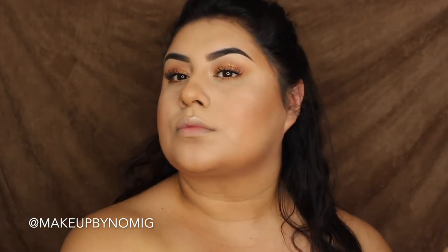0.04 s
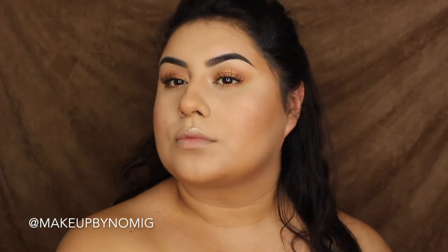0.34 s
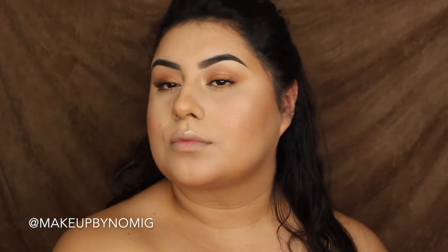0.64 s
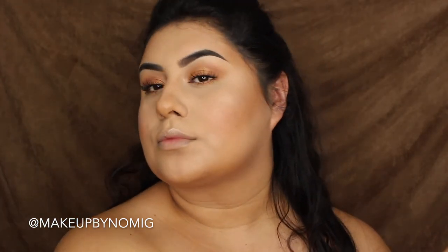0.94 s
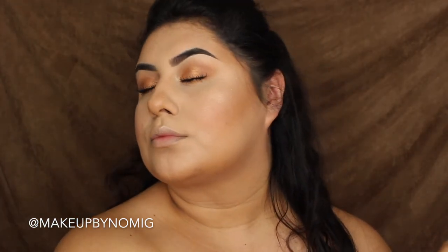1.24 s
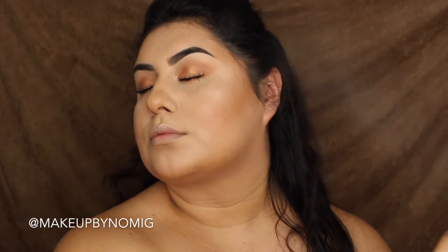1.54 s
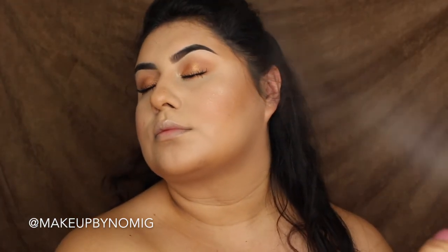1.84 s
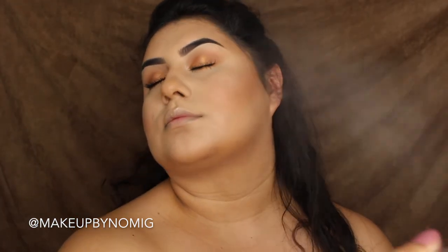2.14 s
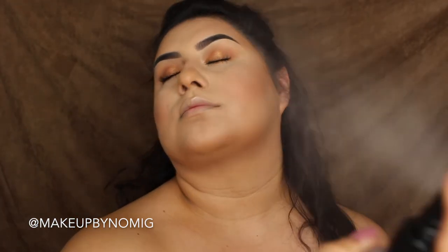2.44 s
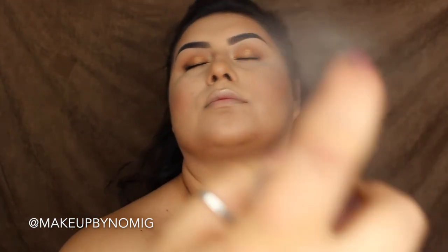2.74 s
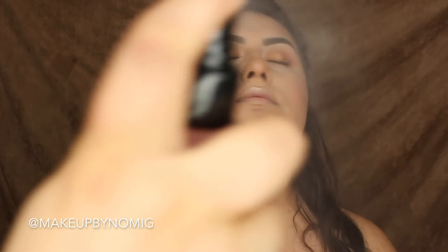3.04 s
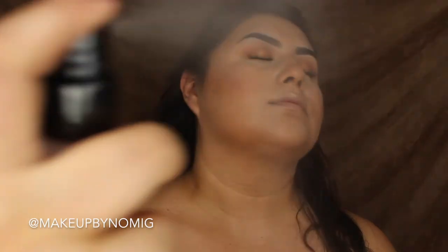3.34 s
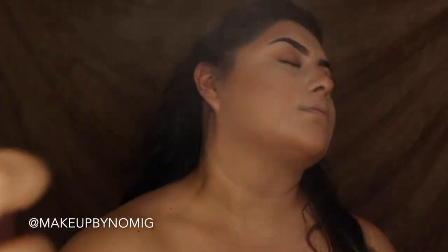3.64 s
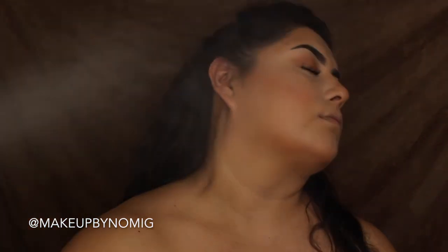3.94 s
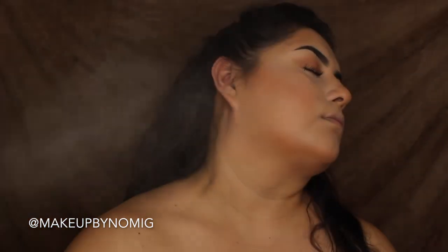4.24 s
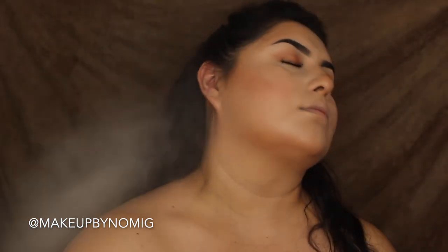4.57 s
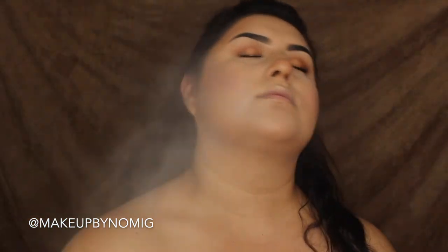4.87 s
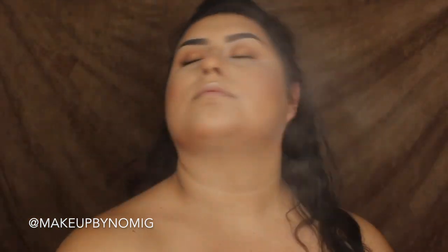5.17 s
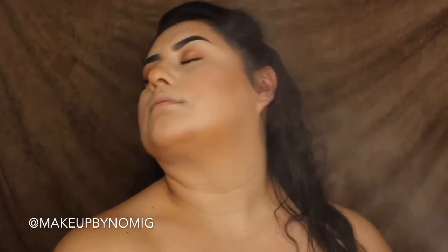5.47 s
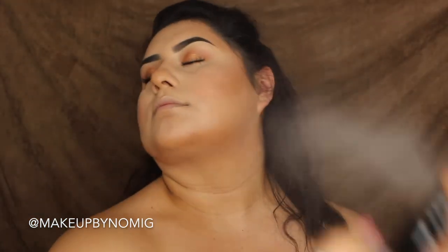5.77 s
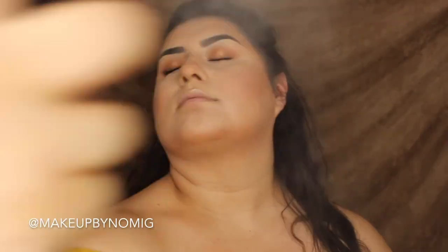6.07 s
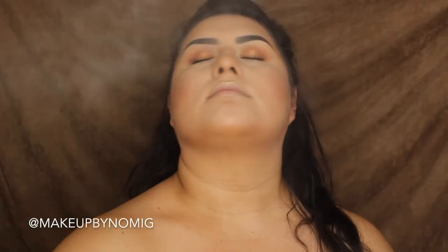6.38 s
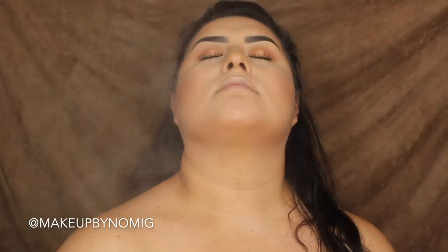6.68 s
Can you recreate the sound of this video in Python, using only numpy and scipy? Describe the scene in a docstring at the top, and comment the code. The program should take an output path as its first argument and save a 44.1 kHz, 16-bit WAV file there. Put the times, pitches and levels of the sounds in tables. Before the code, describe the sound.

A hand softly shifts its grip on a plastic spray bottle, then starts spritzing close to the microphone, four or five times a second. Every brief hiss of mist begins with a small click and is followed by a dull pop from the returning pump. The run continues without a pause, drifting slightly from side to side. The small room has little echo, only faint air noise, hum and a ticking lens motor.

```python
"""A small mist bottle is pumped 24 times in a quick run, close by in a small draped room.
In each cycle the plastic head clicks under the finger, the nozzle hisses as liquid breaks into drops,
the piston bottoms out, and the valve knocks as it springs back. Steady resonances of the room
colour these sounds, as well as the few rubs and the faint squeak of the grip that precede them.
Behind it lie the faint ticking of a lens focus motor, room air and mains hum."""
import sys
import numpy as np
from scipy import signal
from scipy.fft import rfft, irfft, next_fast_len
from scipy.io import wavfile
from scipy.ndimage import uniform_filter1d

SR = 44100
rng = np.random.default_rng(int(sys.argv[2]) if len(sys.argv) > 2 else 0)


def file_out(sig):
    """Save sig as 16-bit WAV at sys.argv[1]."""
    # one column per channel
    cols = np.atleast_2d(sig).T
    # limit, then scale
    lim = np.clip(cols, -1, 1)
    pcm = np.round(lim * 32767).astype(np.int16)
    wavfile.write(sys.argv[1], SR, pcm)


N = 304731

# pump cycles: (click time [s], nozzle opening time [s], knock time [s],
# click level [dB], jet level [dB], knock level [dB])
CYCLES = [(1.432, 1.465, 1.599, -46.5, -32, -28), (1.663, 1.686, 1.819, -44.5, -30.5, -29.5),
          (1.866, 1.888, 2.015, -43.5, -31.5, -26.5), (2.067, 2.091, 2.223, -43, -30.5, -26),
          (2.269, 2.291, 2.425, -41.5, -30.5, -25), (2.472, 2.496, 2.637, -43, -30, -26),
          (2.674, 2.695, 2.839, -41, -29, -23.5), (2.883, 2.905, 3.047, -41, -28.5, -23.5),
          (3.088, 3.109, 3.26, -40.5, -27.5, -25.5), (3.301, 3.323, 3.472, -40.5, -27.5, -24),
          (3.515, 3.537, 3.683, -39.5, -28, -25), (3.727, 3.749, 3.906, -41, -29, -25),
          (3.945, 3.968, 4.127, -43.5, -30, -27), (4.17, 4.189, 4.343, -44.5, -31.5, -27.5),
          (4.382, 4.403, 4.565, -44.5, -31.5, -32), (4.595, 4.614, 4.777, -41, -31, -24.5),
          (4.815, 4.835, 4.995, -43.5, -30, -23), (5.043, 5.061, 5.234, -42, -29, -25),
          (5.273, 5.295, 5.459, -42.5, -30, -27.5), (5.505, 5.52, 5.697, -42.5, -31.5, -27),
          (5.741, 5.762, 5.937, -44, -30.5, -26), (5.972, 5.994, 6.167, -39.5, -28, -22),
          (6.219, 6.239, 6.424, -37, -28, -39), (6.45, 6.47, 6.655, -38.5, -32, -28.5)]
ORDINARY_DB, ORDINARY_S = -30.0, 0.115  # reference level and length of a stroke


def jet(length, db, width_db, pan_db, size=10240):
    """Atomisation: one stroke hisses, finest at peak pressure, and the coarse drops come last."""
    # jet spectrum: (frequency [Hz], level [dB])
    spectrum = [(150, -32), (330, -28), (560, -20), (720, -19), (900, -18.5), (1250, -12.5), (1600, -6.5),
                (2500, -4), (3600, 0.5), (5400, -4.5), (7500, -11), (9300, -15), (11200, -17),
                (12200, -24.5), (16000, -29.7)]
    # stereo difference relative to the sum: (frequency [Hz], level [dB])
    side_spectrum = [(300, -12), (1300, -23), (2200, -10), (3500, -11.5), (5400, -7), (6200, -9), (7000, 2),
                     (7900, 1), (9000, 2), (10800, -5.5), (12300, -1), (14000, 2), (16000, -12)]
    t, hz = np.arange(size) / SR, bins(size)
    stronger, slower = db - ORDINARY_DB, length - ORDINARY_S
    pressure = np.sin(np.pi * np.clip(t / length, 0, 1))
    rise_s = 0.028 * length * np.exp(-0.12 * stronger)  # a hard push opens the nozzle more abruptly
    opening = 1 - np.exp(-(t / rise_s) ** 2)
    mist_flow = .5 - .5 * np.tanh((t - 0.83 * length) / 0.024)
    dribble = .5 - .5 * np.tanh((t - 0.83 * length - 0.025) / 0.042)
    # a strong jet has more body and a rounder top; a slow one is thinner and airier
    body_db = -0.5 + 0.45 * stronger - 28 * slower
    top_db = 0.4 - 0.6 * stronger + 50 * slower
    shape_db = read(spectrum, hz) + body_db * bump(hz, 1560, 0.3) + top_db * bump(hz, 10900, 0.22)
    sizzle, fizz = 0.85 * bump(hz, 7600, 0.27), 0.7 * bump(hz, 14500, 0.2)
    shape_db = unit_power(shape_db) + stronger * (sizzle + fizz)
    # off axis the two microphones fall out of phase in the treble: sum dips, difference grows
    mid_db = shape_db - 0.91 * width_db * bump(hz, 6400, 0.1)
    side_db = shape_db + read(side_spectrum, hz) + width_db * (1 + 0.5 * bump(hz, 7800, 0.3))
    treble, bass = 1 / (1 + (6000 / (hz + 1)) ** 4), 1 / (1 + (hz / 1900) ** 4)
    mid_side = []
    for part_db in (mid_db, side_db):
        hiss = colour(sputter(size, depth_db=0.9), part_db)
        fine, coarse = (irfft(rfft(hiss) * band, size) for band in (treble, bass))
        medium = hiss - fine - coarse
        mist = medium * amp(2 * (pressure - 1)) + fine * amp(7.5 * (pressure - 1) + 1.45)
        mid_side.append(mist * mist_flow + coarse * dribble)
    return stereo(*mid_side) * opening * amp(db + 0.44) * amp([[pan_db / 2], [-pan_db / 2]])


def strokes(return_s=0.039, return_s_per_db=0.0018):
    """Spring return ends each push, earlier after a hard one: (time [s], length [s], level [dB])."""
    return [(opens, knock - opens - return_s - return_s_per_db * (db - ORDINARY_DB), db)
            for _, opens, knock, _, db, _ in CYCLES]


def sprays():
    """Directivity: as the bottle sweeps to and fro, each jet has its own balance and stereo width."""
    # path of the nozzle: (time [s], left over right [dB], stereo width [dB])
    sweep = [(1.5, -0.6, 2), (2.5, -0.4, 1.3), (2.9, 0.5, -2), (3.3, 0.4, -2.3), (3.8, 1.1, 2.5),
             (4.5, 1, 4), (5.06, 0, -0.3), (5.5, -0.2, 2.8), (6, 0.2, -1.2), (6.25, 0.9, 2.5),
             (6.5, 0.5, 3.5)]
    when, pan_db, width_db = np.transpose(sweep)
    out = np.zeros((2, N))
    for s, length, db in strokes():
        hiss = jet(length, db, np.interp(s, when, width_db), np.interp(s, when, pan_db))
        add(out, s, room(hiss, early_db=-11, tail_db=-10))
    return out


def valve_knocks(slosh_db=-28.5, slosh_s=0.031, size=4096):
    """Impact: the returning piston seats the valve with a dull pop, and liquid stirs in the chamber."""
    # knock spectrum: (frequency [Hz], level [dB])
    spectrum = [(150, -29), (380, -16.5), (560, -4.5), (1100, -5), (1650, 2.5), (2100, -7), (2800, -18.5),
                (5000, -26), (12000, -51)]
    t, out = np.arange(size) / SR, np.zeros((2, N))
    for _, _, s, _, _, db in CYCLES:
        detune = 1 + 0.035 * rng.standard_normal()
        pop = impulse(np.array(spectrum) * [detune, 1])
        stir = amp(slosh_db) * rng.standard_normal(size) * (rng.random(size) < .1) * np.exp(-t / slosh_s)
        stir[0] = 1  # the impact itself
        knock = -amp(db + 1) * signal.fftconvolve(stir, pop)
        add(out, s + 0.00148, room(knock, early_db=-4.5, tail_db=-9))
    return out


def head_clicks(ring_db=-9, rattle_db=-12, rattle_s=0.0035, size=4096):
    """Contact chatter: the head snaps against its stem, rattles briefly and rings the bottle."""
    # snap spectrum: (frequency [Hz], level [dB])
    spectrum = [(30, -36), (150, -23), (400, -17), (750, -3), (1700, -4), (2400, -9), (4200, -1.5),
                (6500, -8), (9000, -17), (16000, -27.5)]
    t, out = np.arange(size) / SR, np.zeros((2, N))
    bands = [signal.butter(2, 2200, kind, fs=SR, output="sos") for kind in ("low", "high")]
    for s, _, _, click_db, jet_db, _ in CYCLES:
        contact = amp(rattle_db) * rng.standard_normal(size) * np.exp(-t / rattle_s)
        contact[0] = 1  # the first contact
        snap = signal.fftconvolve(contact, impulse(spectrum))[:size]
        click = snap + amp(ring_db) * bottle_ring(t, cutoff_hz=9000)
        parts = [signal.sosfilt(band, click) for band in bands]
        low, high = (part / part[t < .01].std() for part in parts)
        bright_db = -1 + 0.8 * (jet_db - ORDINARY_DB)  # brighter before a strong jet
        click = amp(click_db - 2.6) * (low - amp(bright_db) * high)
        add(out, s + .0009, room(click, early_db=-7, tail_db=-5))
    return out


def piston_stops(thud_db=-43, lead_s=0.016, size=4096):
    """Cushioned impact: the piston bottoms out on liquid as the jet dies."""
    t, out = np.arange(size) / SR, np.zeros(N)
    for s, length, _ in strokes():
        thud = bottle_ring(t, cutoff_hz=760) * (1 - np.exp(-t / 0.0013))
        add(out, s + length - lead_s, amp(thud_db) * thud)
    return out


def bottle_ring(t, cutoff_hz):
    """Modal vibration: struck plastic rings in damped sines; a softer blow has a lower cutoff."""
    # modes of head and bottle: (frequency [Hz], level [dB], 60 dB decay time [s])
    modes = [(560, -9.5, 0.053), (745, 1.5, 0.036), (1490, -17, 0.012), (1716, 2, 0.015),
             (2790, -12, 0.053), (3480, -7.5, 0.059), (4150, -19, 0.052), (5200, -9, 0.055),
             (6160, -18, 0.034)]
    hz, db, t60 = np.transpose(modes)[:, :, None]
    detune, uneven = rng.standard_normal((2, len(modes), 1))
    envelopes = amp(db + 2 * uneven) * np.exp(-np.log(1000) * t / t60)
    partials = envelopes * np.sin(2 * np.pi * hz * (1 + 0.0454 * detune) * t)
    return (partials / (1 + (hz / cutoff_hz) ** 4)).sum(0)


def finger_rubs():
    """Sliding friction: skin shifting on plastic makes soft bursts of noise."""
    # shifts of the grip: (time [s], level [dB], length [s])
    shifts = [(0.018, -51, 0.037), (1.168, -54.5, .03), (1.243, -53.5, .045), (1.387, -56, .02)]
    # rub spectrum: (frequency [Hz], level [dB])
    spectrum = [(200, -6), (750, 9), (2200, -2), (4200, -3.5), (5700, -5), (8000, -22), (16000, -30)]
    out = np.zeros(N)
    for s, db, length in shifts:
        t = np.arange(round(2 * length * SR)) / SR
        rub = unit_rms(colour(sputter(len(t), depth_db=1), read(spectrum, bins(len(t)))))
        envelope = (1 - np.exp(-t / 0.0038)) * np.exp(-2 * t / length)
        add(out, s, amp(db + 4.5) * rub * envelope)
    return out


def grip_squeak():
    """Stick-slip friction: skin on smooth plastic gives a brief, wavering tone."""
    # course of the squeak: (time [s], frequency [Hz], level [dB])
    course = [(.29, 1850, -83), (.32, 1860, -60), (.38, 1875, -65), (.42, 1915, -71), (.5, 1900, -74)]
    t = np.arange(N) / SR
    s, hz, db = np.transpose(course)
    waver = unit_rms(uniform_filter1d(rng.standard_normal(N), 300))
    turns = np.cumsum(np.interp(t, s, hz) * (1 + 0.0117 * waver)) / SR
    return amp(np.interp(t, s, db, left=-200, right=-200)) * np.sin(2 * np.pi * turns)


def focus_motor(tick_db=-53, clock_hz=29.97, size=3072):
    """Damped vibration: the lens motor hunts in groups of four ticks, each two tones and a scrape."""
    t, out = np.arange(size) / SR, np.zeros(N)
    steps = np.arange(-1, 23)[:, None] * 9 + np.arange(4) * 2  # groups 9 steps apart, ticks 2
    starts = steps.ravel() / clock_hz + .253
    tones = np.sin(2 * np.pi * 720 * t) + amp(-8) * np.sin(2 * np.pi * 1037 * t)
    envelope = np.exp(-t / 0.011) * (1 - np.exp(-t / 0.0011))
    for s in starts[starts > 0]:
        scrape = unit_rms(colour(rng.standard_normal(size), 30 * bump(bins(size), 600, 1.6)))
        add(out, s, amp(tick_db + .5 * rng.standard_normal()) * (tones + 0.75 * scrape) * envelope)
    return out


def room_air(air_db=-56):
    """Noise floor: broadband ventilation rumble and microphone hiss, with the harmonics of mains hum."""
    # air spectrum: (frequency [Hz], level [dB])
    spectrum = [(20, -22), (42, -16), (60, -18), (85, -0.5), (115, 3), (150, -3.5), (230, -7), (400, -11),
                (800, -16.5), (1600, -19), (4000, -21.5), (8000, -27), (14000, -34.5), (16000, -41)]
    # stereo difference relative to the sum: (frequency [Hz], level [dB])
    side_spectrum = [(30, -2), (80, -7), (130, -6.5), (220, 1), (450, 3), (900, 6), (2500, 4.5),
                     (5000, 2.5), (15000, 2)]
    # mains harmonics: (frequency [Hz], rms level [dB])
    harmonics = [(60, -72), (120, -63), (180, -76)]
    hz, t = bins(N), np.arange(N) / SR
    mid_db = unit_power(read(spectrum, hz))
    side_db = mid_db + read(side_spectrum, hz)
    mid, side = colour(rng.standard_normal((2, N)), np.array([mid_db, side_db]))
    hum = sum(np.sqrt(2) * amp(db) * np.sin(2 * np.pi * (f * t + rng.random())) for f, db in harmonics)
    return amp(air_db) * stereo(mid, side) + hum


def room_resonances(x, dip_db=-1.25):
    """Resonance: the room adds narrow, steady peaks between about 650 and 1600 Hz to the pump sounds."""
    # room resonances: (frequency [Hz], bandwidth [Hz], gain [dB])
    resonances = [(649, 63, 5), (750, 43, 1), (904, 44, 6.5), (1042, 29, 4), (1210, 55, 5), (1578, 47, 1.5)]
    size = next_fast_len(N)
    hz = bins(size)
    lift_db = sum(db / (1 + (2 * (hz - centre) / width) ** 2) for centre, width, db in resonances)
    gain = amp(lift_db + dip_db * bump(hz, 910, 0.55))
    return irfft(rfft(x, size) * gain, size)[:, :N]


def room(x, early_db, tail_db, size=11264):
    """Reverberation: early reflections from near surfaces, then a damped tail, drawn anew each call."""
    # room decay: (frequency [Hz], 60 dB decay time [s])
    t60 = [(200, 0.24), (700, 0.32), (1600, 0.3), (3500, 0.31), (7000, 0.28), (14000, 0.29)]
    t = np.arange(size) / SR
    early = rng.standard_normal((2, size)) * (rng.random((2, size)) < 2500 / SR)
    early = early * np.exp(-t / 0.0093) * (t > .001)
    hz, when, noise = signal.stft(rng.standard_normal((2, size)), SR, nperseg=256)
    decay = np.exp(-np.log(1000) * when / read(t60, hz)[:, None])
    tail = signal.istft(noise * decay, SR, nperseg=256)[1][:, :size]
    tail = tail * np.clip(t / .012 - .5, 0, 1)
    early, tail = (v / np.linalg.norm(v, axis=1, keepdims=True) for v in (early, tail))
    response = amp(early_db) * stereo(early[0], 0.37 * early[1])
    response += amp(tail_db) * stereo(tail[0], 0.46 * tail[1])
    response[:, 0] += 1  # the direct sound
    return signal.fftconvolve(np.atleast_2d(x), response, axes=1)


def sputter(size, depth_db):
    """Random amplitude modulation: noise whose level varies over about two milliseconds."""
    clumps = unit_rms(uniform_filter1d(rng.standard_normal(size), 90))
    return unit_rms(rng.standard_normal(size) * amp(depth_db * clumps))


def impulse(points, size=1024):
    """Minimum phase: the shortest causal click with this spectrum, peak 1."""
    log_gain = np.log(amp(read(points, abs(np.fft.fftfreq(size, 1 / SR)))))
    click = np.fft.ifft(np.exp(np.conj(signal.hilbert(log_gain)))).real
    return click / abs(click).max()


def amp(db):
    """Decibels to amplitude ratio."""
    return 10 ** (np.asarray(db) / 20)


def unit_rms(x):
    """Normalises a signal to rms 1."""
    return x / np.sqrt(np.mean(x ** 2) + 1e-20)


def unit_power(db):
    """Normalises a spectrum in dB to mean power 1."""
    return db - 10 * np.log10(np.mean(amp(db) ** 2))


def read(points, hz):
    """Linear interpolation of a table over log frequency."""
    f, value = np.transpose(points)
    return np.interp(np.log(hz + 1), np.log(f + 1), value)


def bins(size):
    """Frequencies of a real FFT."""
    return np.fft.rfftfreq(size, 1 / SR)


def colour(x, db):
    """Spectral filtering by a gain in dB for each bin."""
    return irfft(rfft(x) * amp(db), x.shape[-1])


def bump(hz, centre_hz, octaves):
    """A Gaussian over log frequency, height 1."""
    return np.exp(-.5 * (np.log2((hz + 1) / centre_hz) / octaves) ** 2)


def stereo(mid, side):
    """Left and right from sum and difference."""
    return np.array([mid + side, mid - side])


def add(mix, s, sound):
    """Superposes a sound on the mix at time s."""
    part = mix[..., max(round(s * SR), 0):][..., :sound.shape[-1]]
    part += sound[..., :part.shape[-1]]


def scene():
    """Superposition: the bottle's sounds, coloured by the room, over the background."""
    handling = room(piston_stops() + finger_rubs() + grip_squeak(), early_db=-12, tail_db=-10)[:, :N]
    bottle = sprays() + head_clicks() + valve_knocks() + handling
    return room_resonances(bottle) + focus_motor() + room_air()


def record(dry):
    """Band limiting: a steep low-pass filter removes the highest treble."""
    lowpass = signal.firwin(511, cutoff=16200, window=("kaiser", 9), fs=SR)
    return signal.oaconvolve(dry, lowpass[None], "same", axes=1)


dry = scene()
out = record(dry)
file_out(out)
```